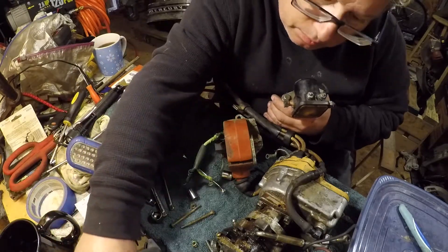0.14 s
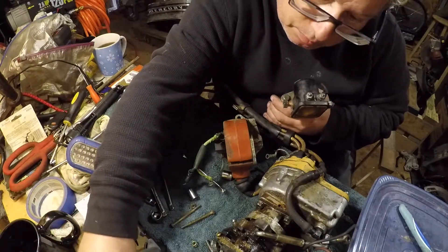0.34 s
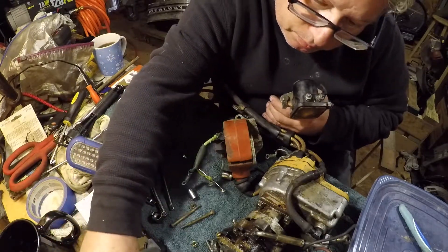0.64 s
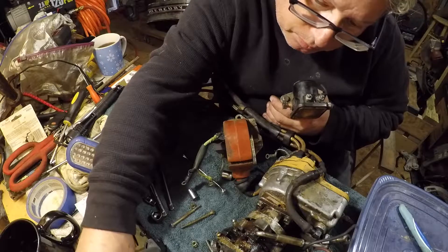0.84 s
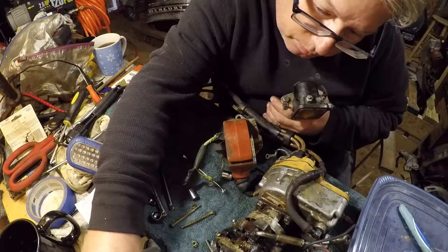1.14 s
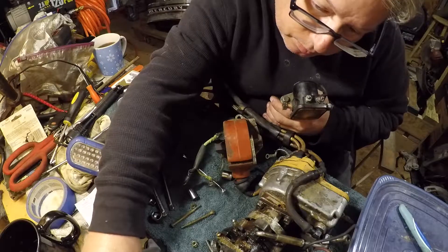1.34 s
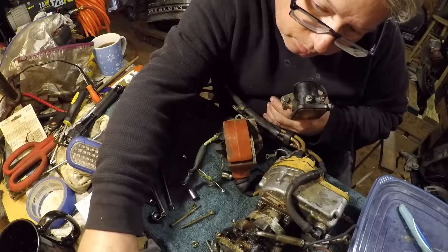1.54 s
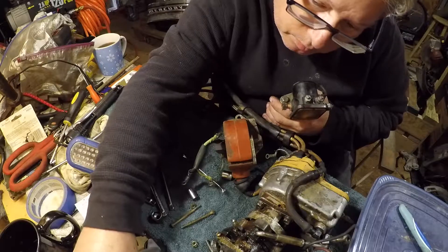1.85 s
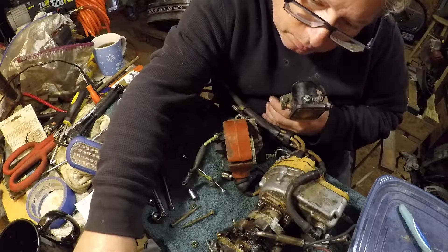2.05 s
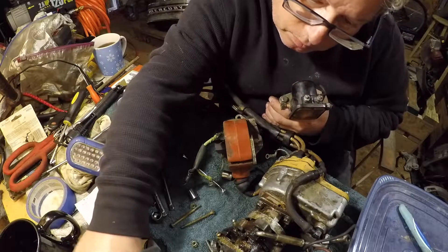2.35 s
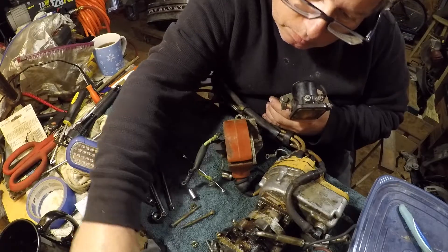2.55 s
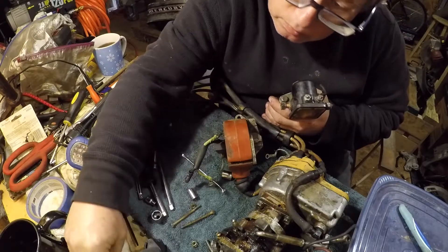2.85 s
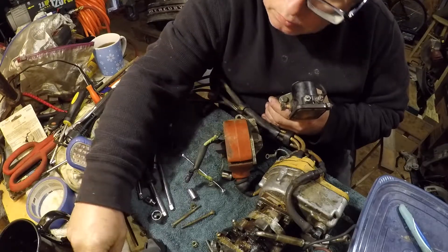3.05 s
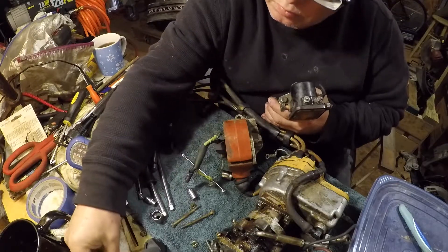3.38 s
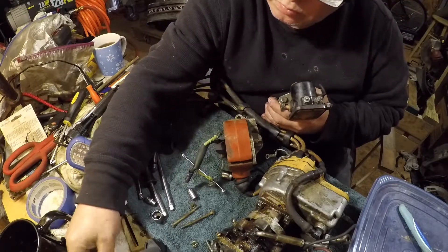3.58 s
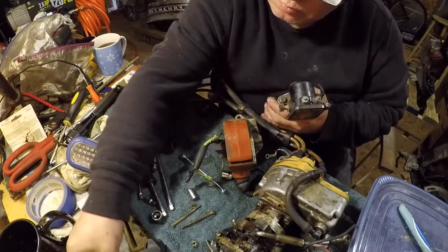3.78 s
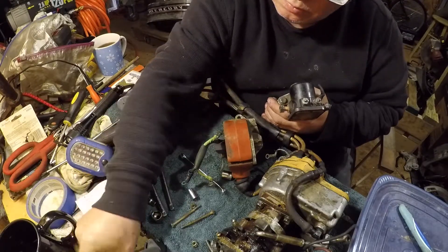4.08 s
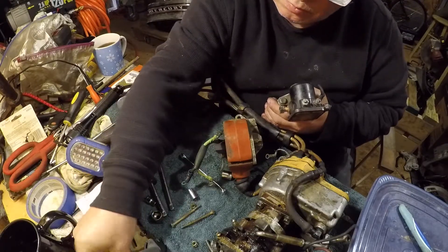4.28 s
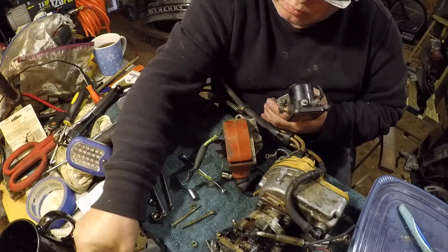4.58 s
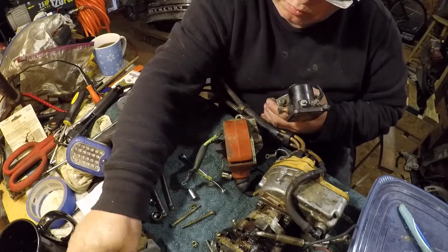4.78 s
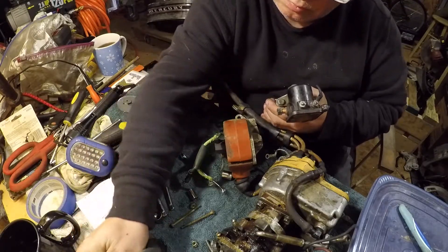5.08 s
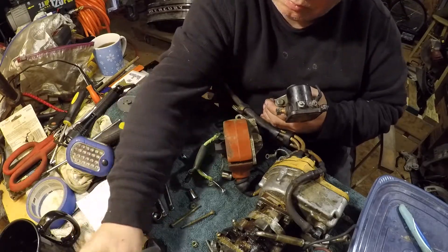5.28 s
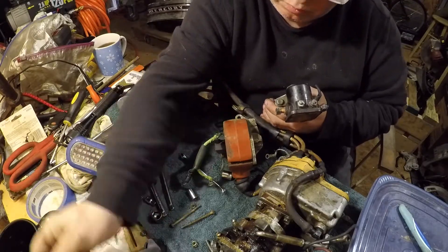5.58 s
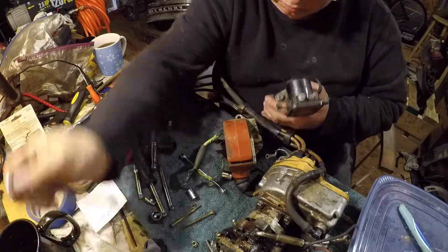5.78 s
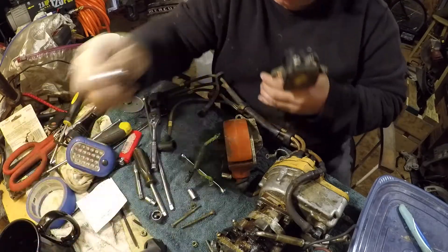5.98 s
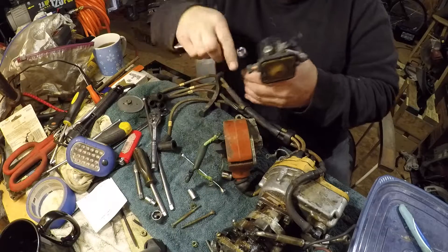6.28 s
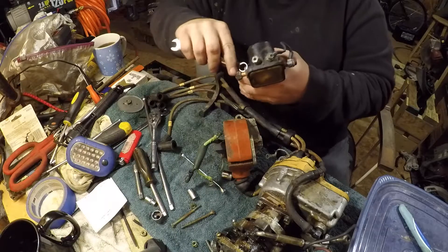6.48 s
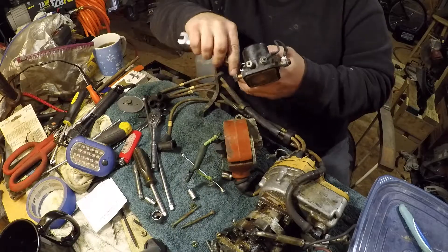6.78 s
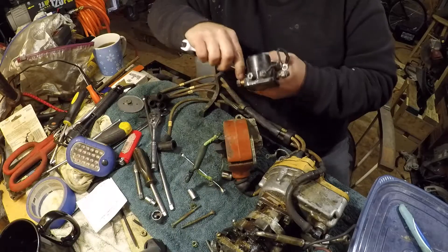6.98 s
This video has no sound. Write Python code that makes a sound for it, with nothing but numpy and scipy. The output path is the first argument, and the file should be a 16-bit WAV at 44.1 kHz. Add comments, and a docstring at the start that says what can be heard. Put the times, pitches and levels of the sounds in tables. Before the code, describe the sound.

Close to the microphone, a hand rummages through steel tools on a cluttered wooden workbench. Wrenches and sockets clink, slide and drop in irregular bursts, with dull thuds from the bench and bumps on hollow objects. After a last bright clatter, one wrench is lifted out, rubs softly against a hand-held metal part and taps it. Low, steady room noise fills a small garage with little echo.

```python
"""A garage workbench, wooden and cluttered, close to the microphone: a hand rummages through steel tools.
Wrenches slide, ring and drop; the bench thuds under them and hollow things are bumped.
One wrench is lifted out, rubs on a hand-held metal casting and taps it.
Gain control ducks the room noise after loud blows, and the hardest blows clip."""
import sys
import numpy as np
from scipy import signal
from scipy.fft import rfft, irfft
from scipy.io import wavfile
from scipy.ndimage import uniform_filter1d

SR = 44100
rng = np.random.default_rng(int(sys.argv[2]) if len(sys.argv) > 2 else 0)


def to_wav(s):
    """Save 16-bit WAV."""
    ch = np.atleast_2d(s).T  # columns
    pcm = np.round(np.clip(ch, -1, 1) * 32767)  # PCM
    wavfile.write(sys.argv[1], SR, pcm.astype(np.int16))


N = 314433
STEEL_LOW_HZ = 820  # small steel parts barely radiate below this
# edges of the six bench bands: f/Hz
BENCH_EDGES_HZ = [50, 140, 290, 520, 950, 2000, 6800]


def amp(db):
    """Decibels to gain."""
    return 10 ** (np.asarray(db) / 20)


def panned(db, pan_db):
    """Left and right gains, pan_db apart."""
    return amp([[db + pan_db / 2], [db - pan_db / 2]])


def read(points, hz):
    """Table value on a log-frequency axis."""
    f, value = np.transpose(points)
    return np.interp(np.log(hz + 1), np.log(f), value)


def unit(x):
    """Scales each channel to the energy of 30 ms at full level."""
    return x * np.sqrt(.03 * SR / (np.sum(x ** 2, -1, keepdims=True) + 1e-20))


def butter(x, order, hz, kind="low"):
    """Butterworth filter."""
    return signal.sosfilt(signal.butter(order, hz, kind, fs=SR, output="sos"), x + 1e-12)


def add(mix, s, sound):
    """Mixes a stereo sound in at time s."""
    part = mix[:, round(s * SR):][:, :sound.shape[1]]
    part += sound[:, :part.shape[1]]


def ring_time():
    """Time axis of one contact, in s."""
    return np.arange(int(.42 * SR)) / SR


def decay(t, t60):
    """Envelope falling 60 dB in t60 seconds."""
    return np.exp(-np.log(1000) * t / t60)


def stereo(pair, corr):
    """Blends two independent signals to a channel correlation of -1 to 1."""
    return np.array([pair[0], corr * pair[0] + np.sqrt(1 - corr ** 2) * pair[1]])


def ring(modes, detune=0.005, uneven_db=2):
    """Decaying modes; strength varies with the strike point, pitch with how the piece rests."""
    t = ring_time()
    hz, db, t60 = np.transpose(modes)
    gains = amp(db + uneven_db * rng.standard_normal((2, len(hz))))
    weights = gains * np.exp(2j * np.pi * rng.random(gains.shape))
    hz = hz * (1 + detune * rng.standard_normal(len(hz)))
    phase = 2 * np.pi * hz[:, None] * t
    fade = decay(t, t60[:, None])
    return weights.real @ (fade * np.sin(phase)) + weights.imag @ (fade * np.cos(phase))


def burst(t60):
    """Dense, damped modes: decaying noise."""
    t = ring_time()
    n = min(int(1.5 * t60 * SR), len(t))
    return np.pad(rng.standard_normal((2, n)) * decay(t[:n], t60), ((0, 0), (0, len(t) - n)))


def jangle(modes, t60, width_hz, uneven_db=3, rise_s=0.0005, detune=0.0071):
    """Rattling smears each mode into a narrow band of decaying noise."""
    t = ring_time()
    hz = np.fft.rfftfreq(len(t), 1 / SR)
    power = np.zeros(len(hz))
    for f, db, _ in modes:
        gain = amp(db - uneven_db * rng.standard_normal())
        centre_hz = f * (1 + detune * rng.standard_normal())
        power += (gain / (1 + ((hz - centre_hz) / width_hz) ** 2)) ** 2
    noise = irfft(rfft(rng.standard_normal((2, len(t)))) * np.sqrt(power), len(t))
    return noise * (1 - np.exp(-(t / rise_s) ** 2)) * decay(t, t60)


def slips(length_s, strength=1, per_s=1100, size_db=2.5):
    """Contact force: a first catch, then tiny slips that swell and fade."""
    n = max(int(length_s * SR), 8)
    size = amp(size_db * np.minimum(rng.exponential(1, n), 3))
    slipping = rng.random(n) < per_s / SR
    swell = signal.windows.tukey(n, min(0.23 + length_s / 0.88, 1))  # gentler in long slides
    force = strength * size * rng.choice([-1, 1], n) * slipping * swell
    force[0] += 1
    return force


def air(rms_db=-36):
    """Steady room noise, in phase in the bass and opposed near 1 kHz."""
    # noise density: f/Hz, relative level/dB
    density = [(25, -20), (55, -32.5), (79, -4.5), (110, -12), (170, -5), (350, -4), (700, -1.5),
               (1300, -6.5), (2200, -17.5), (3100, -23), (4300, -25.5), (5200, -26.5), (8700, -30.5),
               (13000, -42), (15500, -58)]
    # between channels: f/Hz, correlation
    corr = [(60, 0.99), (130, 0.69), (290, -0.21), (640, -0.78), (1400, -0.74), (3100, 0.44),
            (6800, 0.0097)]
    hz = np.fft.rfftfreq(N, 1 / SR)
    white = stereo(rfft(rng.standard_normal((2, N))), read(corr, hz))
    noise = irfft(white * amp(read(density, hz)), N)
    return amp(rms_db) * noise / noise.std()


def bench(levels_db, force, modes_db=1, knock_t60=0.02, knock_db=-4):
    """A force excites a dead knock, board modes and loose clutter, band by band."""
    # board modes: f/Hz, level/dB, t60/s
    board = [(51.2, -14, 0.57), (79.85, 1.5, 0.37), (110.1, -2.5, 0.25), (151.6, 1.5, 0.14),
             (185.3, 6.5, 0.21), (213, -8.5, 0.32), (237.7, 9, 0.093), (303.3, -1, 0.14), (360, 9, 0.062),
             (392.3, 14, 0.094), (548, 1.5, 0.12), (563, 6.5, 0.034), (743.3, -7, 0.12), (968, 15, 0.059),
             (1129, 13.5, 0.068), (1488, 10.5, 0.023)]
    # clutter, one row a band: t60/s, channel correlation, left-right/dB
    clutter = [(0.54, 1, -1.5), (0.12, 0.92, -2), (.075, 0.7, -4), (0.06, -0.46, -5), (0.05, -0.81, 7.5),
               (0.016, 0.75, -2)]
    out = np.zeros((2, len(ring_time()) + len(force) - 1))
    for db, (t60, corr, pan_db), lo, hi in zip(levels_db, clutter, BENCH_EDGES_HZ, BENCH_EDGES_HZ[1:]):
        if db < -62:
            continue
        dense = unit(burst(t60)) + amp(knock_db) * unit(burst(knock_t60))
        response = unit(butter(dense, 3, [lo, hi], "band"))
        modes = [mode for mode in board if lo <= mode[0] < hi]
        if modes:  # wood does not ring in the treble
            response += amp(modes_db) * unit(butter(ring(modes, detune=0.0084), 3, [lo, hi], "band"))
        sound = unit(signal.fftconvolve(response, force[None], axes=1))
        out += panned(db, pan_db) * unit(stereo(sound, corr))
    return out


def knocks(chatter=0.56, roll_off_db_per_oct=9.5, contact_1khz_s=0.00877):
    """Tools and fingers land on the bench and chatter; harder blows are brighter and shorter."""
    # t/s, level/dB, hardness (roll-off corner)/Hz, weight into the frame/dB
    blows = [(0.129, -6, 286, -0.5), (0.145, -19.5, 330, -9), (0.441, -9.5, 2010, -17),
             (0.452, 0.5, 920, -5.5), (0.463, 4.5, 250, -13), (0.488, -4.5, 500, -30),
             (.552, -5.5, 804, -10), (.622, -2, 3200, -0.5), (0.684, 0.5, 410, -4.5),
             (.966, -10.5, 1100, -21), (1.028, -6, 4600, -6), (1.035, -3, 280, -1.5), (1.091, -27, 300, 13),
             (1.186, -23, 1860, 6), (1.357, -8.5, 4530, 0.5), (1.428, -13.5, 940, -3),
             (1.699, -4, 4900, -5), (1.707, 0, 243, -12), (1.877, -11.5, 2420, 1.5),
             (1.976, 0.5, 2970, -3.5), (2.007, -5, 283, -2.5), (2.122, -14.5, 247, -5),
             (2.152, -26, 397, -3), (2.284, -20.5, 377, 13.5), (2.436, -5, 800, -6), (2.456, -4, 1800, 4.5),
             (2.494, -2, 2130, -13), (2.78, -10, 2170, -52), (2.804, -18, 1070, -12),
             (3.104, -7.5, 2100, -16), (3.114, -11.5, 400, -14), (3.195, -10, 397, -9),
             (3.214, -9.5, 320, -8), (3.239, -6, 2470, -22), (3.243, -8, 1960, -12), (3.983, -1, 480, -5.5),
             (4.2566, -11.5, 1090, -13), (4.270, -4, 530, -4), (4.282, -10, 280, -3.5),
             (4.303, -17.5, 400, 1), (4.332, -16, 360, 4), (4.379, -25, 150, 11), (4.481, 2, 750, -10.5),
             (4.708, -4.5, 2260, -30), (5.043, -9.5, 155, -9), (5.267, -15, 179, 3.5),
             (5.303, -7, 1800, -8), (5.33, -2.5, 1320, -9), (5.536, -7, 202, -8.5)]
    # perfectly hard blow, per band: level/dB
    hard_blow_db = [-1.5, -1.5, -3, -1.5, -3, -12]
    mix = np.zeros((2, N))
    centres_hz = np.sqrt(np.multiply(BENCH_EDGES_HZ[:-1], BENCH_EDGES_HZ[1:]))
    for s, db, hardness_hz, weight_db in blows:
        loss = amp(roll_off_db_per_oct * np.log2(centres_hz / hardness_hz))
        levels_db = db + np.array(hard_blow_db) - 10 * np.log10(1 + loss ** 2)
        levels_db[0] += weight_db
        length_s = contact_1khz_s * (1000 / hardness_hz) ** 0.17
        force = np.pad(slips(length_s, strength=chatter), (0, int(length_s * SR)))
        modes_db = 7 + 0.12 * min(weight_db, 0)  # light blows ring the board less
        add(mix, s, bench(levels_db, butter(force, 2, hardness_hz), modes_db))
    return mix


def bumps(lower_ratio=0.58, rise_per_t60=0.099, rattle_db=-5, cutoff_ratio=1.57, left_lead_rad=1.67):
    """Soft blows on hollow things: two short resonances, leading on the left, and a little rattle."""
    # t/s, level/dB, main f/Hz, t60/s, left-right/dB, lower resonance/dB
    blows = [(.431, -5.5, 741, 0.063, 7.5, -31), (1.334, -26, 691, 0.067, -27.5, 1),
             (2.495, -6, 1380, 0.053, 7, -11), (3.1055, -8.5, 1406, 0.043, 7, -7),
             (3.193, -12.5, 608, 0.048, -12.5, -4.5), (3.717, -22, 656, 0.13, -9, -6.5),
             (3.9799, 1, 646, 0.042, -15.5, 2), (4.249, -17, 640, 0.023, -10.5, -3.5),
             (4.256, -7, 910, 0.0081, 1, 0), (4.264, -3.5, 689, 0.049, -3, -1),
             (4.4805, 5.5, 659, 0.056, -7, -1.5), (5.006, -24, 590, 0.05, -13, -10)]
    mix, t = np.zeros((2, N)), ring_time()
    lead = np.array([[left_lead_rad], [0]])
    for s, db, hz, t60, pan_db, lower_db in blows:
        modes = [(hz, 0, t60), (hz * lower_ratio, lower_db, t60)]
        tone = sum(amp(level) * np.sin(2 * np.pi * f * t + lead) for f, level, _ in modes)
        rattle = stereo(jangle(modes, t60, width_hz=0.25 * hz), corr=-0.28)
        sound = unit(tone * decay(t, t60)) + amp(rattle_db) * unit(rattle)
        sound *= 1 - np.exp(-t / (rise_per_t60 * t60))
        add(mix, s, panned(db, pan_db) * unit(butter(sound, 2, cutoff_ratio * hz)))
    return mix


def snaps(t60=0.012, band_hz=(2800, 7500)):
    """Steel edge meets edge: a bright crack, too brief to ring."""
    # t/s, level/dB
    hits = [(0.441, -25.5), (0.6216, -33), (1.032, -30), (1.357, -19.5), (1.632, -26.5), (1.7, -27),
            (1.978, -20), (2.007, -20), (2.495, -32), (2.781, -44), (3.2353, -28.5), (4.272, -41.5),
            (4.481, -43), (4.712, -33), (5.323, -19), (5.531, -23.5)]
    mix = np.zeros((2, N))
    for s, db in hits:
        crack = butter(burst(t60), 3, band_hz, "band")
        add(mix, s, amp(db) * unit(stereo(crack, corr=0.17)))
    return mix


def steel(piece, modes, crack_db, crack_t60, crack_hz, jangle_t60, width_hz, ring_db,
          bench_db=None, loose_db=None):
    """Contacts crack, rattle and ring a piece; optionally they jingle loose bits and shake the bench."""
    # steel on steel, clink if short, slide if long: t/s, piece, length/s, level/dB
    contacts = [(0.548, "long wrench", 0.026, -17), (0.562, "long wrench", 0.045, -13.5),
                (0.626, "long wrench", 0.045, -19), (0.677, "sockets", 0.012, -23.5),
                (0.955, "long wrench", 0.018, -25.5), (0.966, "long wrench", 0.039, -16.5),
                (1.029, "long wrench", 0.0045, -16.5), (1.047, "jaw", 0.0056, -14),
                (1.091, "sockets", 0.0043, -26.5), (1.185, "sockets", 0.0022, -33),
                (1.358, "long wrench", 0.017, -17), (1.417, "flat wrench", 0.027, -19.5),
                (1.612, "long wrench", 0.034, -21.5), (1.721, "sockets", 0.012, -28.5),
                (1.84, "long wrench", 0.053, -18), (2, "flat wrench", 0.0031, -16.5),
                (2.427, "sockets", 0.047, -22), (2.453, "tray", 0.03, -11.5), (2.498, "tray", 0.0047, -14),
                (2.77, "tray", 0.0133, -27), (3.103, "tray", 0.011, -25.5), (3.213, "sockets", 0.0014, -36),
                (3.246, "tray", 0.013, -19.5), (4.413, "sockets", 0.053, -39.5),
                (4.693, "sockets", 0.015, -31), (4.707, "tray", 0.0235, -17.5),
                (4.886, "sockets", 0.043, -37.5), (4.987, "sockets", 0.069, -33.5),
                (5.288, "small wrench", 0.016, -16), (5.293, "tray", 0.023, -12.5),
                (5.3, "small wrench", 0.032, -12), (5.324, "sockets", 0.0032, -11.5),
                (5.441, "small wrench", 0.013, -40), (5.481, "small wrench", 0.06, -34),
                (5.531, "small wrench", 0.011, -16), (6.453, "small wrench", 0.004, -39),
                (6.488, "small wrench", 0.0041, -42), (6.57, "jaw", 0.064, -16.5)]
    # bench under a slide, per band: level/dB
    slide_db = [-0.5, 2, -3.5, 1, -8.5, -20.5]
    mix = np.zeros((2, N))
    for s, _, length_s, db in (row for row in contacts if row[1] == piece):
        force = slips(length_s)
        crack = butter(burst(crack_t60), 4, [1700, crack_hz], "band")
        response = unit(jangle(modes, jangle_t60, width_hz))
        response += amp(ring_db) * unit(ring(modes)) + amp(crack_db) * unit(crack)
        if loose_db is not None:
            response += amp(loose_db) * unit(loose_bits())
        radiated = butter(response, 2, STEEL_LOW_HZ, "high")
        sound = signal.oaconvolve(radiated, force[None], axes=1)
        add(mix, s, amp(db) * unit(stereo(sound, corr=0.088)))
        if bench_db is not None:
            add(mix, s, bench(db + bench_db + np.array(slide_db), force))
    return mix


def loose_bits(count=36, band_hz=(2100, 8000), t60=0.25):
    """Nearby sockets and bits jingle, different ones each time."""
    return ring([(hz, 0, t60) for hz in rng.uniform(*band_hz, count)])


def tools():
    """Three wrenches, a wrench jaw, a tin tray and sockets clink and slide, each with its own modes."""
    # modes: f/Hz, level/dB, t60/s
    long_wrench = [(1503, 16.5, 0.12), (2050, 9, .08), (2670, 6.5, 0.056), (3200, 9.5, 0.11),
                   (3900, 4.5, 0.05), (4780, 5.5, .05), (5420, 9, 0.08), (5920, 17.5, 0.072),
                   (6550, 6.5, 0.07), (9500, -6, 0.1), (10400, -3, 0.09), (12600, -21, 0.16),
                   (13940, -18, .1)]
    flat_wrench = [(1520, 7, .08), (3340, 0, .06), (5600, -4.5, .06), (6000, 16.5, 0.18), (6300, 3, .1),
                   (9350, 6, 0.072), (9640, -8.5, .08), (13100, -25.5, .12)]
    small_wrench = [(3200, -2, 0.035), (3580, 7.5, 0.16), (4500, 4, 0.035), (5710, -1, 0.04),
                    (6625, 12.5, 0.14), (7480, -5, 0.04), (9440, -7, 0.047), (10050, -2, 0.077),
                    (11930, -12.5, 0.07), (14200, -20, .08)]
    jaw = [(3260, 11, 0.12), (5550, 7, 0.09), (5760, 5.5, 0.075), (7000, 14.5, 0.11), (7070, 6, 0.12),
           (8500, -2, 0.1), (9660, -5, 0.09), (10400, -4.5, 0.075), (12300, -10.5, 0.08), (14100, -12, .09)]
    tray = [(1370, 16, 0.052), (1400, 11, 0.12), (2760, 5.5, 0.16)]
    sockets = [(3440, 0, .05), (5070, 13, 0.053), (6060, 8.5, 0.018)]
    mix = steel("long wrench", long_wrench, crack_db=-12, crack_t60=0.018, crack_hz=6300,
                jangle_t60=0.2, width_hz=175, ring_db=-5, bench_db=2.5, loose_db=-14)
    mix += steel("flat wrench", flat_wrench, crack_db=-12.5, crack_t60=0.048, crack_hz=7450,
                 jangle_t60=0.15, width_hz=230, ring_db=-20, bench_db=3)
    mix += steel("small wrench", small_wrench, crack_db=-12, crack_t60=0.11, crack_hz=6560,
                 jangle_t60=0.064, width_hz=84, ring_db=-6, bench_db=-15.5, loose_db=-21)
    mix += steel("jaw", jaw, crack_db=-4.5, crack_t60=0.061, crack_hz=6500,
                 jangle_t60=0.035, width_hz=310, ring_db=-24)
    mix += steel("tray", tray, crack_db=-8.5, crack_t60=0.12, crack_hz=5030,
                 jangle_t60=0.25, width_hz=370, ring_db=-15, bench_db=2)
    mix += steel("sockets", sockets, crack_db=-3, crack_t60=0.013, crack_hz=6500,
                 jangle_t60=0.045, width_hz=230, ring_db=-10.5, bench_db=1)
    return mix


def rub(per_s=1300, size_db=0.5, grip_s=0.027):
    """Wrench rubs on casting: tiny slips stir each resonance in fits as the contact point moves."""
    # resonances and one broad scrape band: f/Hz, width/Hz, level/dB
    resonances = [(1280, 180, -4), (1840, 150, -3), (2090, 100, -3), (2920, 2600, -17.5), (4290, 420, -9),
                  (5400, 330, -11.5)]
    # rubbing pressure: t/s, level/dB
    pressure = [(6.05, -79), (6.2, -54), (6.31, -47), (6.42, -48), (6.76, -42.5), (6.87, -34.5), (7.0, -44),
                (7.13, -54)]
    hz = np.fft.rfftfreq(N, 1 / SR)
    size = amp(size_db * np.minimum(rng.exponential(1, N), 3))
    force_spectrum = rfft(size * rng.choice([-1, 1], N) * (rng.random(N) < per_s / SR))
    sound = np.zeros((2, N))
    for f, width_hz, db in resonances:
        grip = uniform_filter1d(rng.standard_normal(N), int(grip_s * SR))
        fits_db = 4 * np.clip(grip / grip.std(), -2, 1.5)
        body = np.exp(2j * np.pi * rng.random((2, 1))) / (1 + 2j * (hz - f) / width_hz) ** 2
        sound += amp(db + fits_db) * irfft(force_spectrum * body, N)
    sound = stereo(sound, corr=0.63)
    level_db = np.interp(np.arange(N) / SR, *np.transpose(pressure), left=-np.inf)
    return sound / sound.std() * amp(level_db)


def taps(rise_s=0.00057, rattle_db=-11):
    """Wrench taps casting: the hand stops the strong modes at once, weak ones rattle and ring on."""
    # t/s, level/dB, hardness (roll-off corner)/Hz
    hits = [(6.452, -33.5, 6000), (6.6398, -16.5, 6500), (6.6538, -17.5, 2300)]
    # modes: f/Hz, level/dB, t60/s
    casting = [(1680, -3, 0.034), (1952, -1.5, 0.016), (3280, -6, 0.015), (3550, -3, 0.014),
               (4050, -3.5, 0.017), (5800, -2, 0.009), (1620, -24, 0.15), (2022, -23, 0.22),
               (3300, -30.5, 0.22), (6900, -25, 0.13)]
    mix = np.zeros((2, N))
    onset = 1 - np.exp(-ring_time() / rise_s)
    for s, db, hardness_hz in hits:
        sound = unit(ring(casting)) + amp(rattle_db) * unit(jangle(casting, t60=0.21, width_hz=230))
        radiated = butter(sound * onset, 4, STEEL_LOW_HZ, "high")
        cushioned = butter(radiated, 1, hardness_hz)
        add(mix, s, amp(db) * unit(stereo(cushioned, corr=0.61)))
    return mix


def garage(x, wet_db=-18, bass_t60=0.18, treble_t60=0.22, split_hz=1500, rise_s=0.0053):
    """A crowded room adds a weak, short tail."""
    bass = butter(stereo(burst(bass_t60), corr=0.78), 2, split_hz)
    treble = butter(burst(treble_t60), 2, split_hz, "high")
    tail = (bass + treble) * (1 - np.exp(-(ring_time() / rise_s) ** 2))
    return x + amp(wet_db) * signal.oaconvolve(x, tail / np.linalg.norm(tail[0]), axes=1)[:, :N]


def scene():
    """All contacts in the room, over its steady noise."""
    return garage(tools() + knocks() + snaps() + bumps() + taps() + rub()) + air()


def record(dry, limit_db=-7.5, sense_s=0.0036, attack_s=0.00075, recover_s=0.3, cutoff_hz=15600):
    """Gain control falls fast and recovers slowly; overshoots clip; a low-pass follows."""
    sense, attack = np.exp(-1 / (sense_s * SR)), np.exp(-1 / (attack_s * SR))
    power = signal.lfilter([1 - sense], [1, -sense], dry ** 2).max(0)
    over_db = np.maximum(10 * np.log10(power + 1e-12) - limit_db, 0)
    fade = np.exp(-np.arange(N) / SR / recover_s)
    held_db = np.maximum.accumulate(over_db / fade) * fade  # decaying peak hold
    ducked = dry / amp(signal.lfilter([1 - attack], [1, -attack], held_db))
    lowpass = signal.firwin(255, cutoff_hz, window=("kaiser", 7), fs=SR)
    return signal.oaconvolve(np.clip(ducked, -1, 1), lowpass[None], "same")


dry = scene()
out = record(dry)
to_wav(out)
```